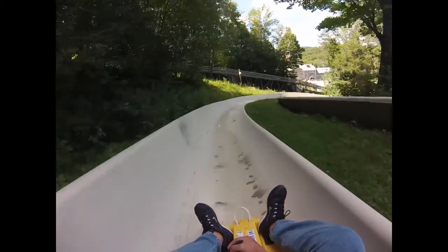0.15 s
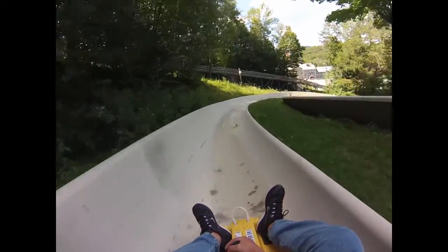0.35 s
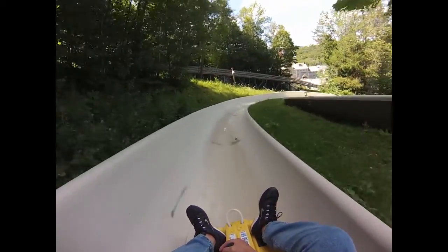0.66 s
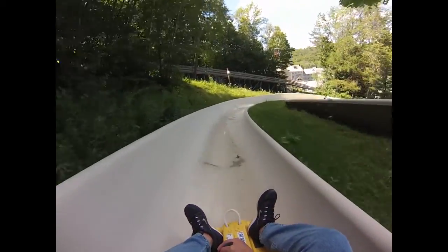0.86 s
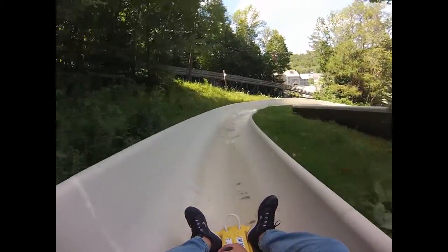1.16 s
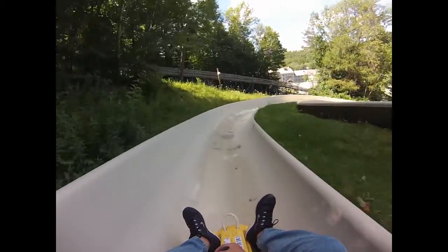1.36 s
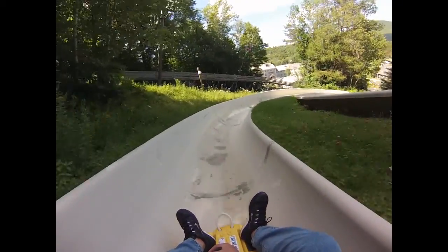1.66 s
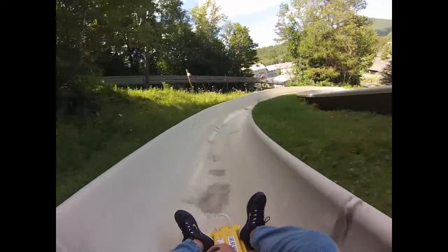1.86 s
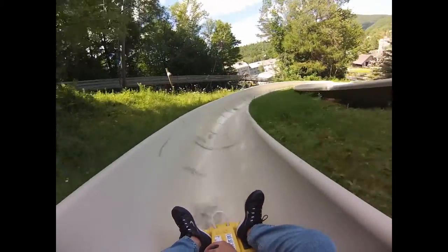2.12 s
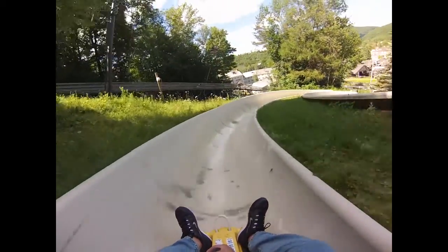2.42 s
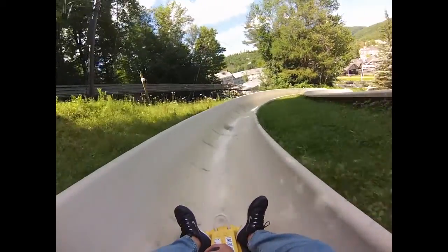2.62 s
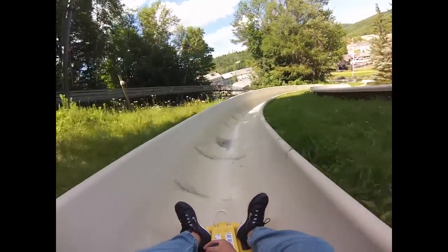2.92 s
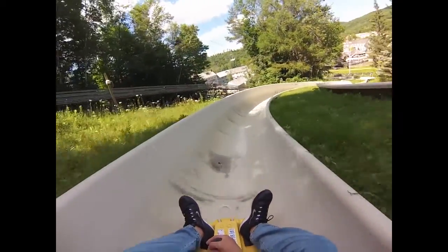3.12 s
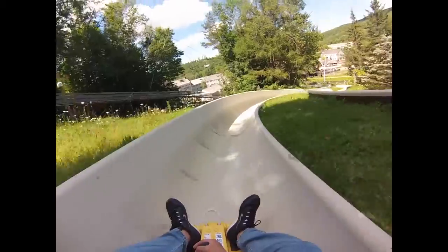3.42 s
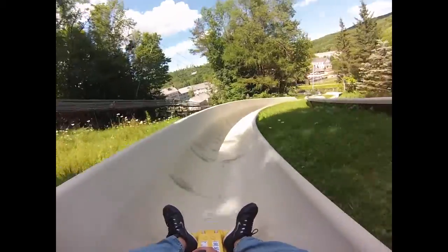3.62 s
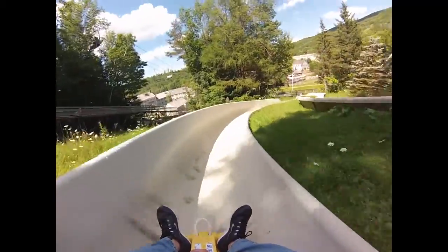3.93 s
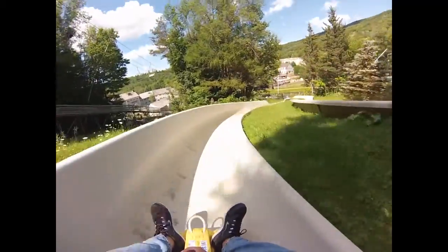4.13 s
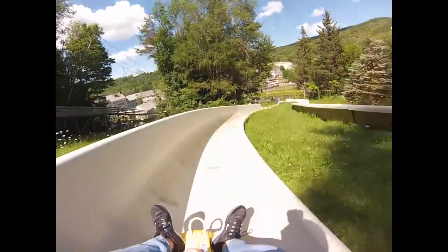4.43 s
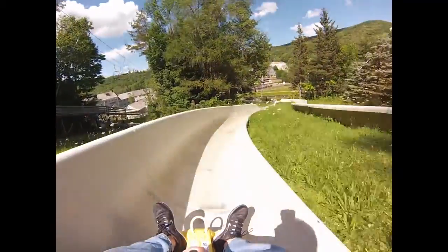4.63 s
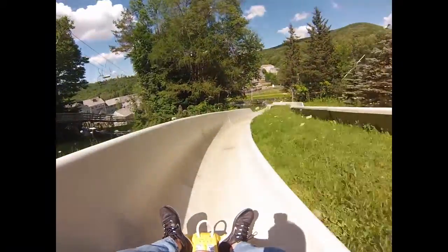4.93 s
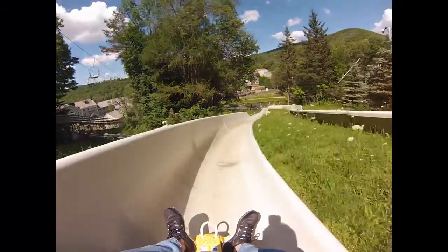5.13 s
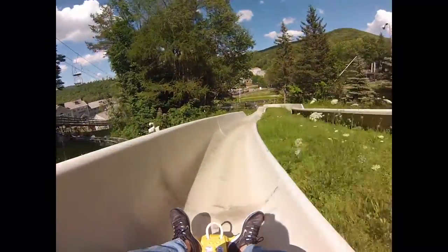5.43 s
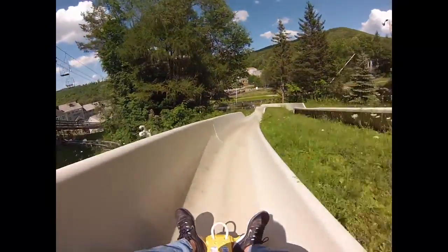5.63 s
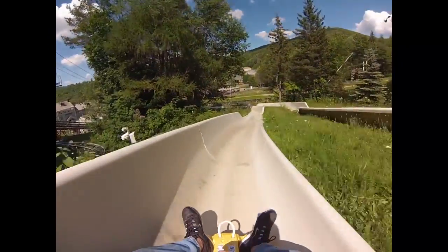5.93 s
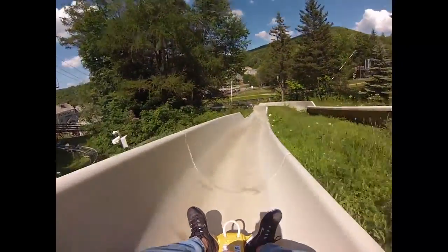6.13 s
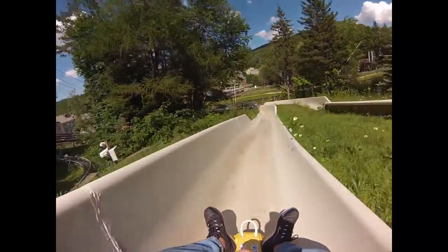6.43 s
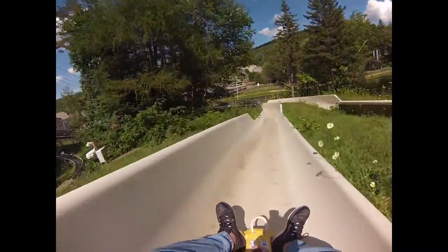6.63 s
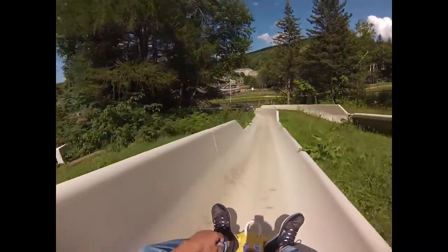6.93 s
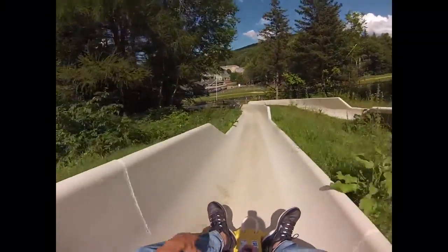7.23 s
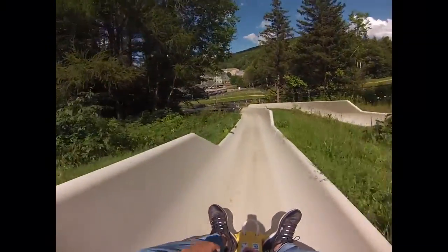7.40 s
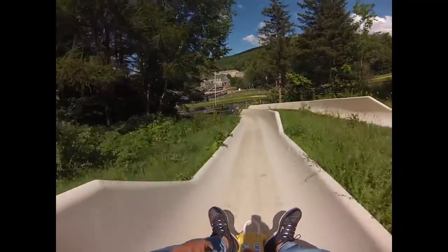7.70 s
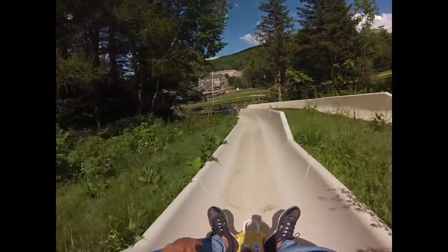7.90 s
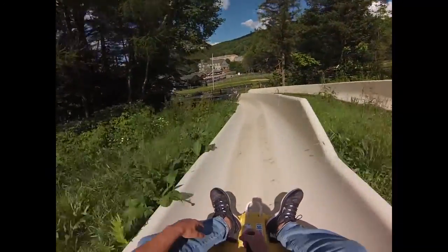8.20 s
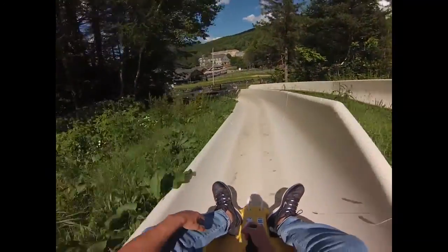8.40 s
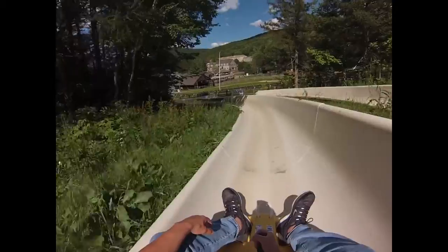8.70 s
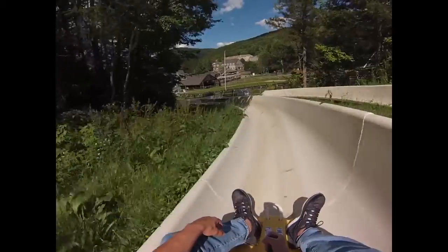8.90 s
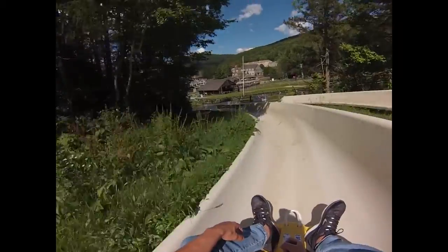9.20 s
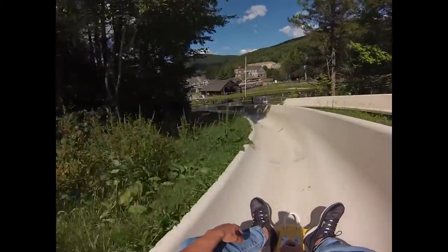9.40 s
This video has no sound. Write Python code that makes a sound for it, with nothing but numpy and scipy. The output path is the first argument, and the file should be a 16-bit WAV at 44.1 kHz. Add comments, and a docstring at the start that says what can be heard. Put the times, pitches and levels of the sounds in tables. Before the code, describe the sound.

Deep, boomy rumble of a sled on a slide trough, dominated by low thumps and wheel thrum, with a dull scrape and drumming behind. Hollow nose-and-tail knocks recur at each joint, with muffled clacks and tiny bright grit ticks between. The strongest jolt comes before four seconds, another busy rattle before six; afterwards it is sparser and slower, with brief squeaks near the end. Close, dry, boxed-in microphone with faint steady noise.

```python
"""The wheels of a sled thrum at multiples of their turning rate as it runs down a moulded slide trough.
Place: on the sled, one microphone in a closed case on the rider's chest, within arm's reach of it all.
At each joint the nose and tail knock, ringing the hollow hull, and low thumps follow in a few deep swings.
Loose parts clack and squeak and the sled scrapes, all filtered noise or tones dulled by the case;
behind them the trough drums, grit ticks, the runners hiss, and the microphone adds steady noise."""
import sys
import numpy as np
from scipy import signal
from scipy.fft import rfft, irfft, next_fast_len
from scipy.io import wavfile
from scipy.ndimage import uniform_filter1d

SR = 44100
rng = np.random.default_rng(int(sys.argv[2]) if len(sys.argv) > 2 else 0)


def wrap_up_sound(samples):
    """Save the sound to the file named by the first command line argument, as 16-bit audio."""
    columns = np.atleast_2d(samples).T
    # keep every value between -1 and 1, then stretch to whole-number steps
    tamed = np.clip(columns, -1, 1)
    steps = np.round(tamed * 32767).astype(np.int16)
    wavfile.write(sys.argv[1], SR, steps)


N = 421155
T = np.arange(N) / SR  # seconds

# Microphone noise spectrum. Each row: frequency in Hz, level in dB.
HISS_SPECTRUM = [(60, -4.5), (300, -1.5), (1000, -10), (2800, -18), (5000, -20.5), (8000, -23.5),
                 (12900, -26)]
HISS_DB, BAND_EDGE_HZ = -69, 12930

# Resonances of the closed case. Each row: frequency in Hz, width in Hz, level in dB.
CASE_MODES = [(597, 430, 2), (792, 82, 3.5), (1109, 220, 5.5), (1343, 117, 5.5), (1467, 210, -1),
              (2170, 470, 1), (2236, 83, -6.5)]
CASE_EDGE_HZ = 2580  # the case wall passes little above this

# Resonances of the runners. Each row: frequency in Hz, width in Hz, level in dB.
RUNNER_MODES = [(2375, 120, 12), (3350, 990, -2.5), (4320, 980, 1.5), (4870, 180, 5), (5200, 500, -8.5),
                (5820, 400, -3), (6870, 1300, -0.5)]
# Hiss of the runners along the ride. Each row: time in seconds, level in dB.
RUNNER_LEVEL = [(0, -79), (.5, -82), (1.0, -75.5), (1.3, -82), (2.5, -83), (3.6, -81.5), (6.4, -83),
                (7.6, -80.5), (8.25, -75), (8.9, -74.5), (9.55, -78)]

# The ride. Each row: time in seconds, body shaking in dB, trough drumming in dB, scrape in dB.
RIDE = [(0.0, -41.5, -64.5, -69.5), (0.4, -46.5, -66.5, -71.5), (0.7, -41, -66.5, -70),
        (1.2, -54, -66, -69), (1.7, -45, -67.5, -71), (2.2, -43, -61.5, -69), (3.2, -53.5, -67, -71),
        (3.64, -43, -57.5, -69), (4.1, -48.5, -65.5, -69.5), (5.0, -46.5, -65.5, -73),
        (5.45, -51, -66.5, -72.5), (5.75, -41.5, -65.5, -71), (6.12, -53.5, -70, -74),
        (6.6, -44, -68.5, -72.5), (7.7, -51.5, -69, -74), (8.67, -53, -72.5, -71), (9.26, -44, -73, -74.5),
        (9.55, -46, -67, -74)]
# Spectrum of the drumming trough. Each row: frequency in Hz, level in dB.
TROUGH_SPECTRUM = [(80, 3), (130, 3), (260, -0.5), (400, -8), (800, -19), (1200, -32), (2000, -66)]
SHUDDER_T60, SHUDDER_DB = 0.44, -15.5  # seconds, and dB against a strike: the trough drums harder after it
# The sled rubs the trough. Each row: start in seconds, length in seconds, level in dB.
SCUFFS = [(0.715, 0.053, -66.5), (1.427, 0.095, -69), (2.134, 0.032, -68), (2.255, 0.097, -68),
          (2.826, 0.046, -67), (3.40, 0.13, -67), (3.659, 0.1, -61.5), (4.94, 0.11, -68.5),
          (5.21, .05, -63.5), (5.614, 0.038, -67), (5.86, 0.096, -66.5), (6.653, 0.17, -67),
          (7.242, 0.13, -69), (9.352, .07, -73)]

# Brief rubs. Each row: start in seconds, level in dB ahead of the case, pitch in Hz, length in ms.
SQUEAKS = [(.236, -64, 2100, 16), (9.277, -63.5, 1460, 13), (9.337, -66.5, 1505, 44)]
# Bright grit ticks. Each row: start in seconds, peak in dB, pitch in Hz.
TICKS = [(0.2364, -65, 4170), (2.3196, -64, 4810), (3.3378, -66, 4210), (3.696, -55, 3030),
         (3.9265, -64, 4800), (4.4613, -61, 3470), (4.577, -65, 3230), (4.6194, -62, 3460),
         (5.233, -58, 3040), (5.8531, -65, 4840), (5.875, -63, 4900), (9.392, -58.5, 4570)]
# Loose parts clack. Each row: start in seconds, peak in dB, pitch in Hz.
CLACKS = [(0.04, -59, 1170), (0.619, -55, 1100), (1.1248, -58, 1360), (2.0335, -44.5, 1450),
          (2.0773, -49, 2000), (2.134, -51.5, 1910), (2.2633, -55, 1160), (2.2957, -53, 1500),
          (2.442, -58, 1150), (2.8379, -57, 1030), (3.468, -52, 1090), (3.681, -57, 1380),
          (3.6923, -40.5, 990), (3.6995, -45, 2020), (3.7094, -49, 1010), (3.7344, -55, 1140),
          (4.2867, -57, 1320), (4.6149, -60, 1360), (5.038, -52, 1710), (5.237, -57, 1280),
          (5.6405, -47.5, 1080), (5.7465, -51, 1430), (5.8696, -55, 1570), (5.913, -58, 1400),
          (6.709, -57, 1120), (7.2577, -58.5, 2300)]
RATTLES_PER_S, RATTLE_DB = 3, -65  # further clacks at chance times, and the lowest of their peaks
CLACK_T60, TICK_T60 = .02, .04  # seconds

# Modes of the hollow sled. Each row: frequency in Hz, level in dB ahead of the weighting by pitch.
HULL_MODES = [(128, -8.5), (168, -7.5), (215, 1.5), (265, -1), (335, -5.5), (470, 7)]
# Further knocks on the hull, some at joints and some between them.
# Each row: time in seconds, peak of the ring in dB, pitch in Hz, rap in dB against that peak, ring T60 in seconds.
FURTHER_KNOCKS = [(1.615, -54, 161, -24, .04), (2.148, -48, 190, -20, 0.05), (2.224, -47.5, 178, -25, .07),
                  (2.274, -47, 210, -15, 0.062), (2.37, -53, 193, -9, .05), (2.413, -46, 161, -24, 0.025),
                  (3.673, -49.5, 161, 2.5, 0.051), (3.69, -35, 161, -2, 0.025), (3.709, -50, 220, -8, .04),
                  (3.729, -52, 278, -6, 0.07), (4.064, -50, 162, -5.5, 0.048), (4.62, -53, 138, -13, 0.11),
                  (4.898, -49.5, 191, -25, 0.032), (5.638, -45, 261, -17, .02),
                  (5.707, -45.5, 206, -22, .07), (5.774, -51, 200, -21, 0.07), (5.815, -55, 186, -17, .05),
                  (7.955, -60, 295, -14, 0.054)]
# Further low thumps, at joints and between them, some merging with the wheel thrum.
# Each row: time of the deepest swing in seconds, peak in dB, pitch in Hz, length in ms.
FURTHER_THUMPS = [(0.583, -30.5, 45, 28), (0.66, -30, 50, 29), (0.83, -30, 45, 25), (1.786, -32, 48, 27),
                  (1.957, -32.5, 48.3, 15), (2.06, -30.5, 48, 34), (2.535, -34, 48.6, 19),
                  (3.003, -31.5, 48, 18.5), (3.698, -13, 43, 32), (4.52, -31.5, 38, 18),
                  (4.997, -29.5, 49.4, 18), (5.09, -31, 48, 31), (5.225, -34, 50.4, 39),
                  (5.635, -35, 51.6, 45), (5.8, -28.5, 55.4, 32), (5.922, -30, 50.3, 26.5),
                  (6.12, -36.5, 50.5, 30), (6.6, -31, 55, 43), (7.35, -36.5, 49.3, 35)]
# Joints of the trough. Each row: time the nose strikes in seconds, peak in dB, pitch in Hz,
# rap in dB against the peak, tail strike in dB, seat drop in dB, length of the drop in ms.
JOINTS = [(-0.083, -50, 200, -6, -56, -25, 45), (0.617, -49, 160, -4, -56, -27, 23),
          (1.309, -47.5, 246, -13, -48, -24.5, 54), (1.982, -47.5, 215, -10, -60, -31.5, 30),
          (2.696, -41, 224, -19, -52, -20, 29), (3.422, -44.5, 218, -14, -53, -28.5, 37),
          (4.169, -45, 194, -21, -58, -28, 30), (4.93, -51, 262, -20, -63, -41, 18),
          (5.743, -43.5, 228, -11, -52.5, -36.5, 61), (6.554, -46, 160, -24, -54, -30.5, 25),
          (7.394, -51.5, 266, -24, -57, -28.5, 34), (8.264, -49, 214, -25, -51.5, -24, 31),
          (9.192, -51, 220, -23, -64, -28.5, 27)]
AXLES_TURNS = 2.02  # the tail meets a joint this many wheel turns after the nose
TAIL_HZ, TAIL_RAP_DB, RING_T60 = 165, -4.5, 0.044  # the ring time, in seconds, serves nose and tail
DROP_LAG_S, DROP_HZ = 0.0187, 49.8
NOSE_LIFT_DB, NOSE_LIFT_MS = 13.5, 15.5  # the body jumps a little at the nose strike

# Spectrum of the shaken sled and rider. Each row: frequency in Hz, level in dB.
BODY_SPECTRUM = [(12, -6), (25, -11.5), (48, 0), (66, -12.5), (78, -21), (95, -28), (120, -30.5),
                 (200, -82)]
# Speed of the wheels. Each row: time in seconds, turns per second.
SPIN = [(0.0, 15.6), (0.7, 15.7), (2.1, 16.9), (3.2, 16.5), (4.9, 15.3), (6.6, 14.0), (7.4, 12.8),
        (8.4, 12.5), (9.0, 11.4), (9.55, 11.4)]
# Multiples of the wheel rate, each with its dB were it on the body's resonance at top speed.
MULTIPLES_DB = {2: -41, 3: -41, 4: -44.5, 5: -56, 6: -50}
BODY_HZ, TOP_SPIN = 50, 16.5  # resonance in Hz, turns per second
OFF_DB_PER_OCTAVE, SLOWING_DB_PER_OCTAVE = 25, 8


def gain_of(db):
    """Decibels to a factor."""
    return 10 ** (np.asarray(db) / 20)


def evened(x):
    """Scales to rms 1."""
    return x / np.sqrt(np.mean(x ** 2) + 1e-20)


def peaked(x):
    """Scales to peak 1."""
    return x / abs(x).max()


def curve(rows, column):
    """One column of a table, sample by sample."""
    rows = np.array(rows)
    return np.interp(T, rows[:, 0], rows[:, column])


def drift(hz):
    """Slow chance, rms 1, moving up to about hz times a second."""
    return evened(signal.sosfilt(signal.butter(2, hz, fs=SR, output="sos"), rng.standard_normal(N)))


def coloured(x, points):
    """Filters by a spectrum given as (Hz, dB) points."""
    size = next_fast_len(len(x))
    f, db = np.transpose(points)
    hz = np.fft.rfftfreq(size, 1 / SR)
    gain = gain_of(np.interp(np.log(hz + 1), np.log(f + 1), db))
    return irfft(rfft(x, size) * gain, size)[:len(x)]


def resonate(x, modes):
    """Sum of two-pole resonances (Hz, width Hz, dB)."""
    return sum(gain_of(db) * signal.lfilter(*signal.iirpeak(hz, hz / width, SR), x)
               for hz, width, db in modes)


def dulled(x):
    """Takes off the top treble."""
    return signal.sosfilt(signal.butter(6, 7300, fs=SR, output="sos"), x)


def encased(x, patchy_db=0):
    """Sound through the case's resonances and wall; each resonance may flicker on its own."""
    rung = 0
    for mode in CASE_MODES:
        flicker = gain_of(patchy_db * drift(17.2)) if patchy_db else 1
        rung = rung + resonate(x, [mode]) * flicker
    return signal.sosfilt(signal.butter(10, CASE_EDGE_HZ, fs=SR, output="sos"), rung)


def add(mix, s, sound):
    """Mixes a sound in at time s, cut where it passes either end."""
    at = round(s * SR)
    sound = sound[max(-at, 0):]
    part = mix[max(at, 0):][:len(sound)]
    part += sound[:len(part)]


def strikes():
    """Every knock on the hull (s, dB, Hz, rap dB, T60 s) and every low thump (s, dB, Hz, ms)."""
    blows, drops = list(FURTHER_KNOCKS), list(FURTHER_THUMPS)
    for s, db, hz, rap_db, tail_db, drop_db, ms in JOINTS:
        tail = s + AXLES_TURNS / np.interp(s, *np.transpose(SPIN))
        blows.append((s, db, hz, rap_db, RING_T60))
        blows.append((tail, tail_db, TAIL_HZ, TAIL_RAP_DB, RING_T60))
        drops.append((s + DROP_LAG_S, db + NOSE_LIFT_DB, DROP_HZ, NOSE_LIFT_MS))
        drops.append((tail + DROP_LAG_S, drop_db, DROP_HZ, ms))
    return blows, drops


def microphone_hiss():
    """Steady coloured noise of the microphone."""
    return gain_of(HISS_DB) * evened(coloured(rng.standard_normal(N), HISS_SPECTRUM))


def grit(per_s, spread_db, flicker_db):
    """Flickering noise with random soft bumps of uneven size."""
    size = gain_of(spread_db * np.minimum(rng.exponential(1, N), 3))
    size = size * (rng.random(N) < per_s / SR)
    bumps = signal.oaconvolve(size, np.hanning(500))[:N] * rng.standard_normal(N)
    return (gain_of(-2.5) * evened(bumps) + rng.standard_normal(N)) * gain_of(flicker_db)


def runners(jolt):
    """The runners hiss: grit noise through their resonances."""
    rough = grit(150., 1.5, .9 * jolt + .8 * drift(8.))
    return gain_of(curve(RUNNER_LEVEL, 1)) * evened(dulled(resonate(rough, RUNNER_MODES)))


def drumming(jolt):
    """The trough drums under the grit, harder for a while after each strike."""
    shudder = np.zeros(N)
    t = np.arange(SR // 2) / SR
    for s, db, *_ in strikes()[0]:
        add(shudder, s, gain_of(db + SHUDDER_DB - 60 * t / SHUDDER_T60))
    rough = grit(80., 2., 1.3 * jolt + 1.2 * drift(14.))
    return evened(coloured(rough, TROUGH_SPECTRUM)) * np.hypot(gain_of(curve(RIDE, 2)), shudder)


def scrape(jolt):
    """The sled scrapes, heard through the flickering resonances of the case, and swells at each scuff."""
    scuffs = np.zeros(N)
    for s, length, db in SCUFFS:
        add(scuffs, s, gain_of(db) * signal.windows.tukey(round(length * SR), .6))
    rough = grit(150., 1.8, 1.1 * jolt + 0.42 * drift(14.0))
    return evened(encased(rough, patchy_db=4.0)) * np.hypot(gain_of(curve(RIDE, 3)), scuffs)


def rolling():
    """One jolting moves runners, trough and scrape together."""
    jolt = drift(17.0)
    return runners(jolt) + drumming(jolt) + scrape(jolt)


def squeaks():
    """Brief rubs: a wobbling tone with an inharmonic partial, heard through the case."""
    out = np.zeros(N)
    for s, db, hz, ms in SQUEAKS:
        size = round(ms / 1000 * SR)
        wobble = 0.04 * evened(uniform_filter1d(rng.standard_normal(size), 150))
        phase = 2 * np.pi * hz * np.cumsum(1 + wobble) / SR
        tone = np.sin(phase) + gain_of(-4.5) * np.sin(1.62 * phase)
        add(out, s, gain_of(db) * tone * signal.windows.tukey(size, .5))
    return encased(out)


def burst(t60, rise_s):
    """Noise that rises fast and dies away."""
    t = np.arange(3500) / SR
    return rng.standard_normal(len(t)) * gain_of(-60 * t / t60) * (1 - np.exp(-t / rise_s))


def ticks():
    """Grit ticks: bright, brief noise around a pitch of its own."""
    out = np.zeros(N)
    for s, db, hz in TICKS:
        tick = dulled(resonate(burst(TICK_T60, .004), [(hz, 1200, 0), (5800, 2000, -4)]))
        add(out, s, gain_of(db) * peaked(tick))
    return out


def clacks():
    """Loose parts: short noise bursts around their own pitch, coloured by the case."""
    out = np.zeros(N)
    chance = rng.random((round(RATTLES_PER_S * N / SR), 3))
    rattles = chance * [N / SR, 5, 600] + [0, RATTLE_DB, 1000]  # s, dB, Hz
    for s, db, hz in list(CLACKS) + list(rattles):
        noise = burst(CLACK_T60, 0.0012)
        pitched = resonate(resonate(noise, [(hz, 1200, 0)]), [(hz, 1200, 0)])
        add(out, s, gain_of(db) * peaked(encased(pitched + gain_of(-16.) * noise)))
    return out


def blow(hz, t60, rise_s):
    """A short damped ring, peak 1."""
    t = np.arange(3500) / SR
    return peaked((1 - np.exp(-t / rise_s)) ** 2 * gain_of(-60 * t / t60) * np.sin(2 * np.pi * hz * t))


def knocks():
    """Hull modes nearest each blow's pitch ring loudest; a puff of trough noise and a woody rap join them."""
    out, t = np.zeros(N), np.arange(3500) / SR
    for s, db, hz, rap_db, t60 in strikes()[0]:
        puff, rap = rng.standard_normal((2, len(t))) * (1 - np.exp(-t / 0.00098))
        puff = evened(coloured(puff, TROUGH_SPECTRUM))
        puff = puff * gain_of(-60 * t / 0.17) * (1 - np.exp(-t / 0.0026))
        rap = resonate(rap * gain_of(-60 * t / 0.07), [(550, 170, 2.0), (730, 83, -4.0)])
        ring = 0
        for mode_hz, mode_db in HULL_MODES:
            off_pitch_db = -18.5 * abs(np.log2(mode_hz / hz))
            ring = ring + gain_of(mode_db + off_pitch_db) * blow(mode_hz, t60, 0.0026)
        knock = peaked(ring) + gain_of(-4.5) * puff + gain_of(rap_db) * peaked(rap)
        add(out, s, gain_of(db) * knock)
    return dulled(out)


def thumps():
    """Each thump is a few low swings that swell fast and fade a little slower."""
    out, t = np.zeros(N), np.arange(-4000, 6000) / SR
    for s, db, hz, ms in strikes()[1]:
        spread = ms / 1000 * np.where(t < .003, .38, .5)
        swell = np.exp(-((t - .003) / spread) ** 2 / 2)
        add(out, s + t[0], -gain_of(db) * swell * np.cos(2 * np.pi * hz * t))
    return out


def body_shaking():
    """Random shaking of sled and rider, following the ride."""
    return gain_of(curve(RIDE, 1)) * evened(coloured(rng.standard_normal(N), BODY_SPECTRUM))


def wheel_thrum():
    """Multiples of the wheel's turning rate are loudest near the body's resonance and at speed."""
    out = np.zeros(N)
    spin = curve(SPIN, 1)
    turns = np.cumsum(spin * (1 + .005 * drift(3.))) / SR
    slowing_db = SLOWING_DB_PER_OCTAVE * np.log2(spin / TOP_SPIN)
    for k, db in MULTIPLES_DB.items():
        off_db = OFF_DB_PER_OCTAVE * abs(np.log2(k * spin / BODY_HZ))
        level = gain_of(db - off_db + slowing_db + 1.8 * drift(4.))
        out += np.sqrt(2) * level * np.sin(2 * np.pi * (k * turns + rng.random()))
    return out


def scene():
    """All sources reach one microphone."""
    loose = squeaks() + ticks() + clacks()
    return (rolling() + loose + knocks() + thumps() + body_shaking() + wheel_thrum())[None]


def record(dry):
    """Adds the microphone hiss, then limits the band."""
    band = signal.firwin(1023, BAND_EDGE_HZ, window=("kaiser", 9), fs=SR)
    return signal.oaconvolve(dry + microphone_hiss(), band[None], "same")


dry = scene()
out = record(dry)
wrap_up_sound(out)
```